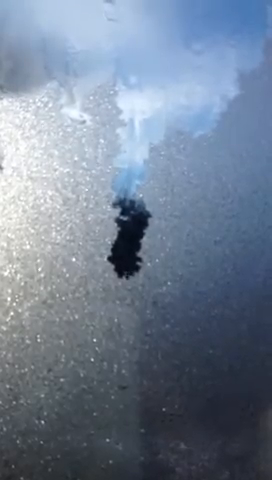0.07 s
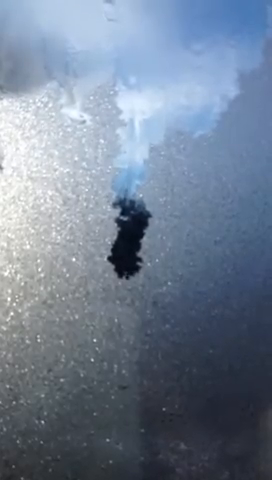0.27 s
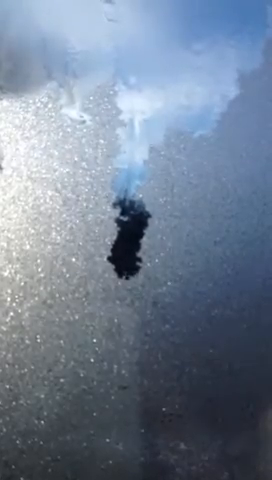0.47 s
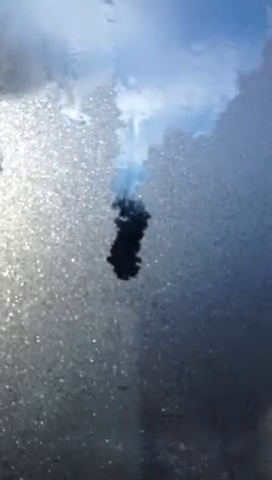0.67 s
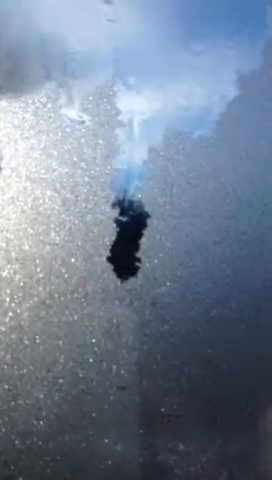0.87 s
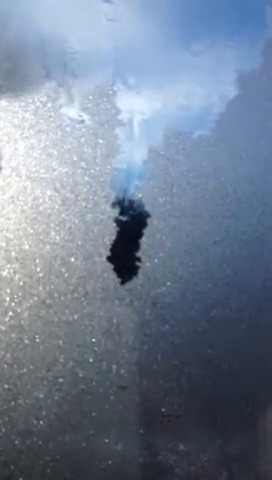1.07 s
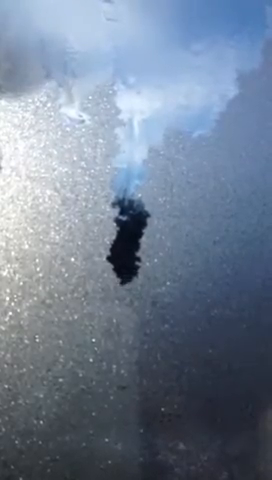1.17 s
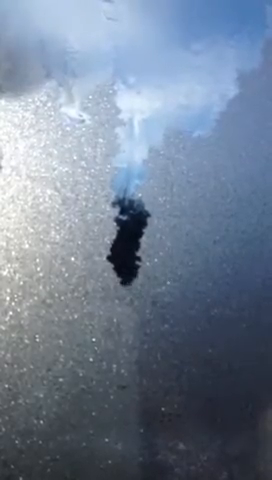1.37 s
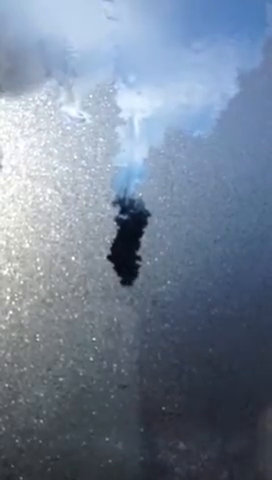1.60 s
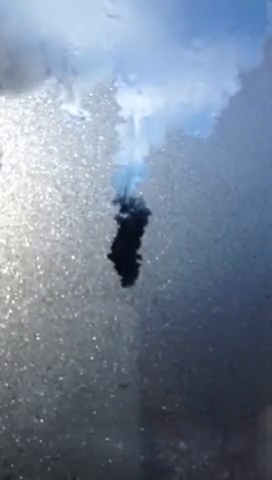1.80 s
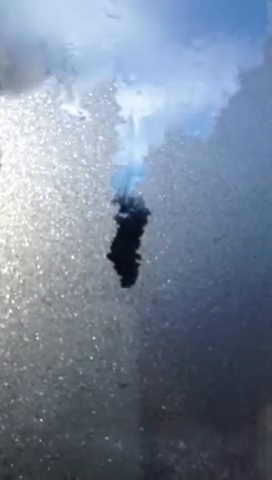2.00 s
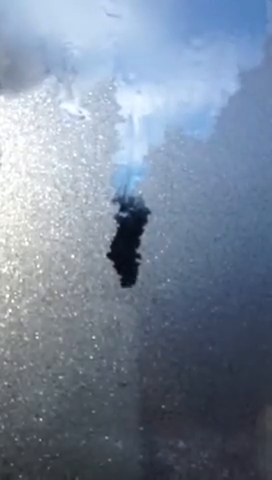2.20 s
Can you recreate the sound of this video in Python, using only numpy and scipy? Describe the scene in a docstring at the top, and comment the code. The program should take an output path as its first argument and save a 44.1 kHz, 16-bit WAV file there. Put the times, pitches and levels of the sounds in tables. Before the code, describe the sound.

A sharp, low wooden knock comes at about 0.2 seconds, ringing briefly in the room and settling with weak rebounds by 0.4. A faint metal ping follows at 0.5 and a soft hollow bump near 0.85. Tiny ticks and light rustles are scattered around 1 to 1.3 seconds and again from 1.8 to 2, over a steady, quiet hum and hiss.

```python
"""A wooden knock in a quiet room

Something wooden bumps sharply and settles in weak rebounds; each blow excites its damped modes and
the room's reverberation. A small metal piece pings and a hollow body answers a padded bump, each in
its own modes. Tiny ticks and soft rustles, bursts of band noise, lie over a low hum and hiss."""
import sys
import numpy as np
from scipy import signal
from scipy.fft import rfft, irfft
from scipy.io import wavfile
from scipy.ndimage import uniform_filter1d

SR = 44100
rng = np.random.default_rng(int(sys.argv[2]) if len(sys.argv) > 2 else 0)


def pcm_store(signal):
    """Save signal as 16-bit PCM."""
    levels = np.round(np.clip(np.atleast_2d(signal), -1, 1) * 32767)
    wavfile.write(sys.argv[1], SR, levels.astype(np.int16).T)


N = 99225
T = np.arange(N) / SR
HZ = np.fft.rfftfreq(N, 1 / SR)


def wooden_knocks(thud_db=-16, tail_db=-27, rise_s=0.00067, low_cut_hz=128):
    """Impact excitation: each blow is a thud, a modal ring and a room tail; the deep bass is thin."""
    # blows (time [s], level [dB], contact corner [Hz], added damping [dB/s])
    blows = [(0.2302, -4.5, 8800, 8.5), (0.2344, 0, 2480, -2), (0.2537, -9, 5000, 11.5),
             (0.379, -17, 1920, 53), (0.394, -20, 800, 64), (0.4129, -8, 250, 100)]
    # modes of the wooden body (frequency [Hz], level [dB], t60 [s])
    wood_modes = [(149, -48, 0.54), (237, -37.5, 0.37), (283.4, -44.5, 0.86), (346, -32, 0.27),
                  (457, -49, 0.51), (476.8, -36, 0.12), (602, -53, 0.37), (687, -40, 0.32),
                  (738.5, -33, 0.19), (818, -29, 0.12), (1130, -57, 0.14), (1419, -45.5, .22),
                  (1788, -39.5, 0.067), (2490, -74.5, .27)]
    # spectrum of a blow's first push (frequency [Hz], relative level [dB])
    thud_spectrum = [(30, -35), (100, -35.5), (220, -10.5), (440, 6.5), (580, -3.5), (760, -1), (1200, -9),
                     (2300, -16.5), (3000, -24), (6000, -40), (15000, -28.5)]
    blow = modal_ring(wood_modes) * (1 - np.exp(-T / rise_s))
    add(blow, 0, amp(thud_db) * pulse(thud_spectrum))
    out = np.zeros(N)
    for s, db, corner_hz, damping in blows:
        reverberant = blow + amp(tail_db) * room_tail()
        add(out, s, amp(db - damping * T) * dull(reverberant, corner_hz))
    return signal.sosfilt(signal.butter(2, low_cut_hz, "high", fs=SR, output="sos"), out)


def hollow_bumps(rise_s=0.021, tail_db=-10.5):
    """Resonance: under a padded contact the modes of a hollow body swell and die away."""
    # soft contacts (time [s], level [dB], contact corner [Hz])
    contacts = [(0.8428, -36, 1100), (0.915, -56.5, 4000)]
    # modes of the hollow body (frequency [Hz], relative level [dB], t60 [s])
    hollow_modes = [(363, -3.5, 0.093), (496, 2, 0.13), (674, 0.5, 0.11), (726, 6.5, 0.09),
                    (833, -0.5, 0.094), (874, -3, 0.14), (1018, -17.5, 0.27), (1325, -17, 0.11)]
    swell = 1 - np.exp(-(T / rise_s) ** 1.1)
    out = np.zeros(N)
    for s, db, corner_hz in contacts:
        reverberant = modal_ring(hollow_modes) + amp(tail_db) * dull(room_tail(), corner_hz=1210)
        add(out, s, amp(db) * dull(reverberant * swell, corner_hz))
    return out


def metal_ping(start_s=0.517, rise_s=0.0013):
    """Free vibration: a small metal piece rings faintly in inharmonic modes."""
    # modes of the metal (frequency [Hz], level [dB], t60 [s])
    metal_modes = [(2000, -76, 0.9), (4678, -63.5, 0.22), (6428, -65, 0.098), (9600, -66, 0.096),
                   (13400, -67, 0.12)]
    out = np.zeros(N)
    add(out, start_s, modal_ring(metal_modes) * (1 - np.exp(-T / rise_s)))
    return out


def ticks():
    """Transients: band noise with a sudden onset and fast exponential decay is heard as a dry click."""
    # tiny clicks (time [s], level [dB], centre [Hz], width [octaves], t60 [s])
    clicks = [(0.449, -60, 9150, 0.27, 0.007), (1.2455, -64, 7700, 0.21, .04),
              (1.253, -69, 4050, 0.89, 0.073), (1.322, -67, 1600, .3, 0.058),
              (1.869, -58, 9200, .28, 0.0063)]
    out = np.zeros(N)
    for s, db, hz, octaves, t60 in clicks:
        add(out, s, band_noise(hz, octaves) * amp(db - 60 * T / t60))
    return out


def rustles(grain_db=0.5):
    """Amplitude modulation: light brushes of band noise swell and fade with a fine random grain."""
    # brushes (peak time [s], half length [s], level [dB], centre [Hz], width [octaves])
    brushes = [(0.596, 0.088, -77.5, 2000, 0.12), (0.65, .032, -63, 360, 0.78),
               (0.924, .005, -54.5, 850, .15), (0.945, 0.02, -70, 1170, 0.84),
               (0.983, 0.011, -73.5, 2310, 0.35), (0.977, 0.018, -70.5, 865, 0.11),
               (1.03, 0.032, -80, 2350, 0.2), (1.772, 0.0099, -70, 800, 2.2), (1.85, 0.022, -69.5, 2190, 1),
               (2.049, 0.075, -67, 3820, 2.4), (2.057, 0.016, -61, 4260, 2.2)]
    flicker = unit(uniform_filter1d(rng.standard_normal(N), size=130))
    out = np.zeros(N)
    for s, half_s, db, hz, octaves in brushes:
        swell = np.exp(-.5 * ((T - s) / half_s) ** 2)
        out += amp(db) * band_noise(hz, octaves) * swell
    return amp(grain_db * flicker) * out


def room_tail(rise_s=0.00092, frame=512):
    """Reverberation: dense reflections decay exponentially, the treble first."""
    # spectrum of the reflections (frequency [Hz], relative level [dB])
    tail_spectrum = [(40, -30), (100, -22), (220, 2), (480, 6.5), (580, 1.5), (800, -1), (1250, -9),
                     (2400, -12.5), (2800, -18.5), (5000, -23), (9500, -31), (14500, -19)]
    # reverberation times (frequency [Hz], t60 [s])
    decay_times = [(120, 0.6), (300, 0.38), (900, 0.28), (2500, 0.27), (6000, 0.18), (14000, 0.14)]
    reflections = noise(amp(curve_at(tail_spectrum, HZ)))
    hz, t, spectra = signal.stft(reflections, SR, nperseg=frame)
    fade = amp(-60 * t / curve_at(decay_times, hz)[:, None])
    tail = signal.istft(spectra * fade, SR, nperseg=frame)[1][:N]
    return tail * (1 - np.exp(-T / rise_s))


def room_air(hiss_db=-66):
    """Stationary noise: a broad hiss, and narrow resonances that waver as a low hum."""
    # spectrum of the air and hiss (frequency [Hz], relative density [dB])
    air_spectrum = [(25, -2), (55, -12.5), (85, 8.5), (140, 9.5), (185, 14.5), (250, 18.5), (320, 12),
                    (470, 10.5), (700, 4.5), (1200, -2.5), (2500, -4.5), (5000, -6), (8000, -8),
                    (10000, -13), (12500, -7.5), (15000, -7)]
    # resonances of the hum (frequency [Hz], half width [Hz], level [dB])
    resonances = [(141.4, 2.6, -75), (236.4, 27, -79), (261.5, 5.6, -75)]
    hum = sum(amp(db) * noise(1 / (1 + ((HZ - hz) / width) ** 2)) for hz, width, db in resonances)
    return amp(hiss_db) * noise(amp(curve_at(air_spectrum, HZ))) + hum


def modal_ring(modes):
    """Modal superposition: a struck object rings as a sum of damped sinusoids."""
    return sum(amp(db - 60 * T / t60) * np.cos(2 * np.pi * hz * T) for hz, db, t60 in modes)


def pulse(spectrum, size=4096):
    """Minimum phase: the shortest causal pulse with this spectrum, at peak 1."""
    log_gain = np.log(amp(curve_at(spectrum, abs(np.fft.fftfreq(size, 1 / SR)))))
    x = np.fft.ifft(np.exp(np.conj(signal.hilbert(log_gain)))).real
    return x / abs(x).max()


def dull(x, corner_hz):
    """Two-pole low-pass: treble is lost, as in a softer contact."""
    pole = np.exp(-2 * np.pi * corner_hz / SR)
    return signal.lfilter([(1 - pole) ** 2], [1, -2 * pole, pole * pole], x)


def band_noise(hz, octaves):
    """Band-pass filtering: noise under a Gaussian bell in log frequency."""
    return noise(np.exp(-.5 * (np.log2((HZ + 1) / hz) / octaves) ** 2))


def noise(gain):
    """Spectral shaping: white noise weighted by gain, at rms 1."""
    return unit(irfft(rfft(rng.standard_normal(N)) * gain, N))


def curve_at(points, hz):
    """Interpolation on a log-frequency axis."""
    f, value = np.transpose(points)
    return np.interp(np.log(hz + 1), np.log(f + 1), value)


def amp(db):
    """Decibels to amplitude ratio."""
    return 10 ** (np.asarray(db) / 20)


def unit(x):
    """Normalisation to rms 1."""
    return x / np.sqrt(np.mean(x ** 2) + 1e-30)


def add(mix, s, sound):
    """Delay and sum: a sound enters the mix at s seconds."""
    part = mix[round(s * SR):][:len(sound)]
    part += sound[:len(part)]


def scene():
    """Superposition: all sources add at one point."""
    return (wooden_knocks() + hollow_bumps() + metal_ping() + ticks() + rustles() + room_air())[None]


def record(dry):
    """Band limiting: a steep low-pass removes the highest treble."""
    low_pass = signal.firwin(1023, cutoff=15330, window=("kaiser", 9), fs=SR)
    return signal.oaconvolve(dry, low_pass[None], "same")


dry = scene()
out = record(dry)
pcm_store(out)
```